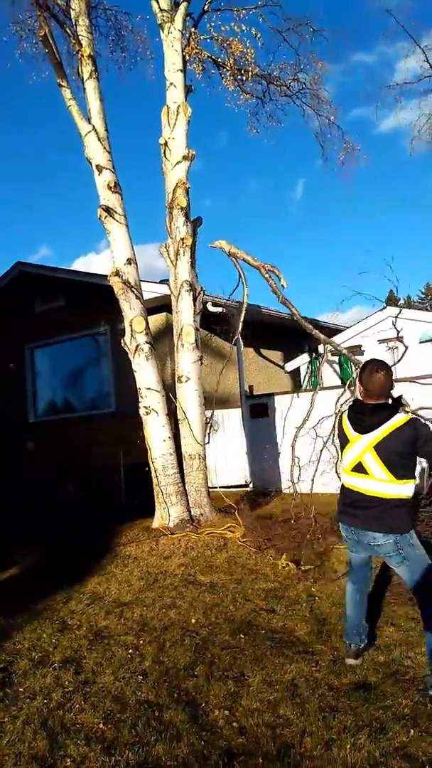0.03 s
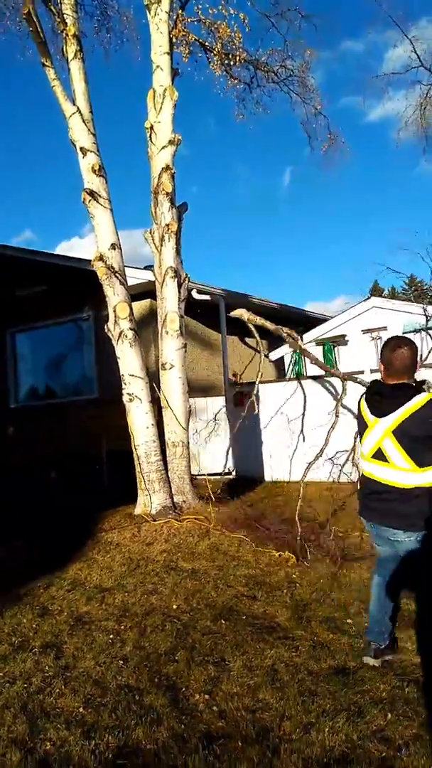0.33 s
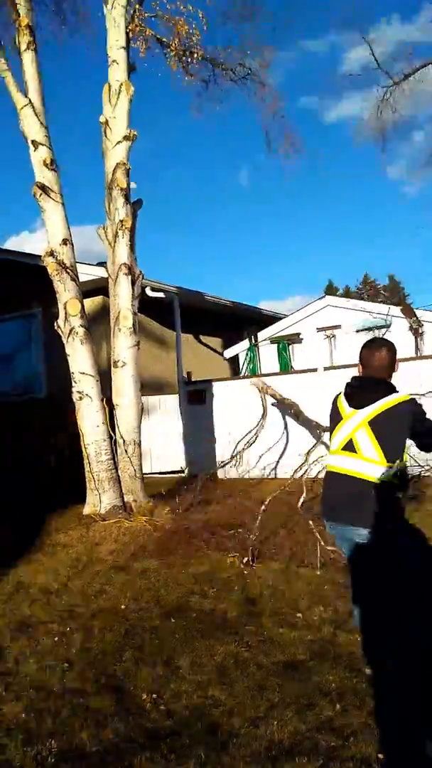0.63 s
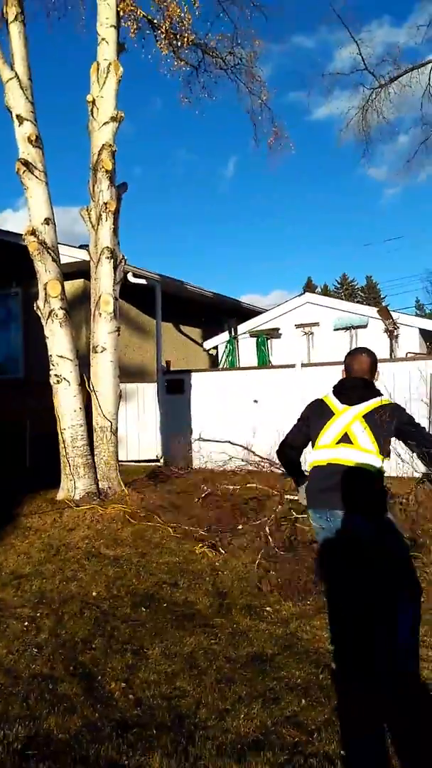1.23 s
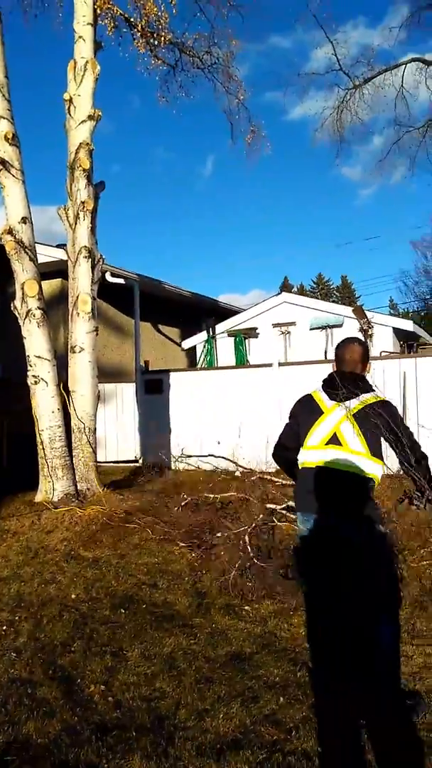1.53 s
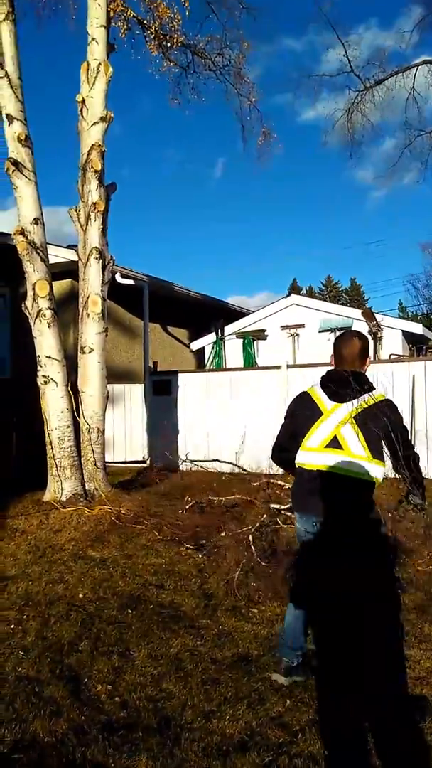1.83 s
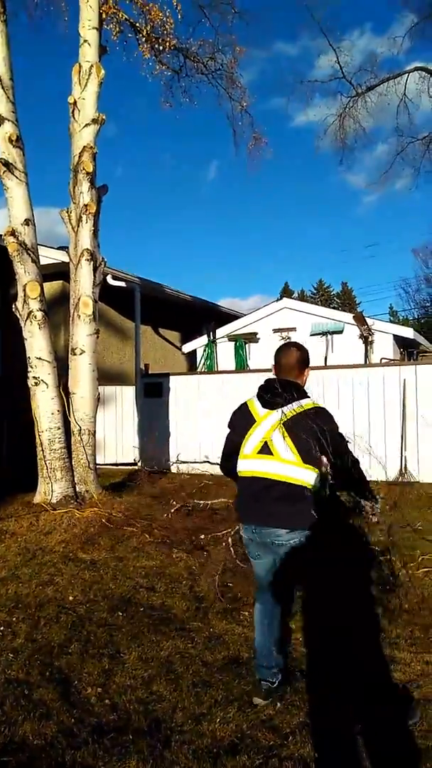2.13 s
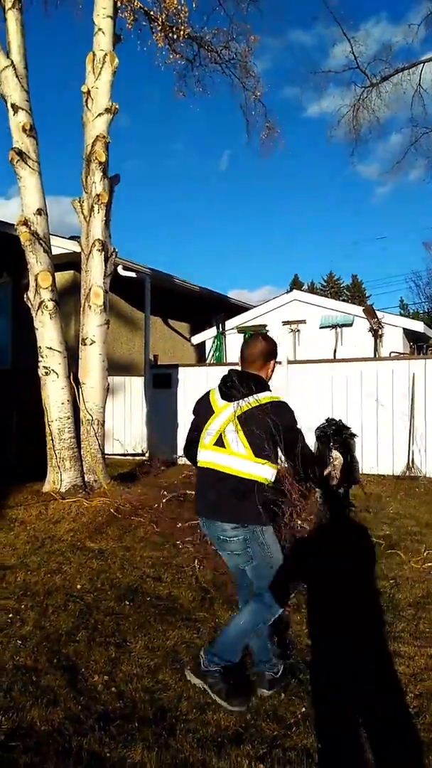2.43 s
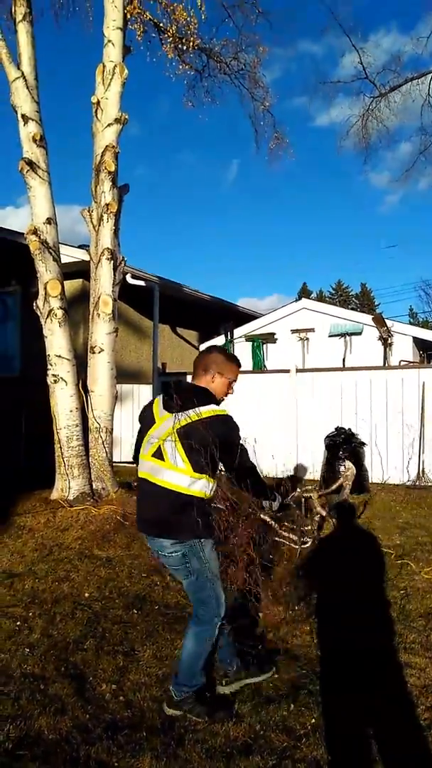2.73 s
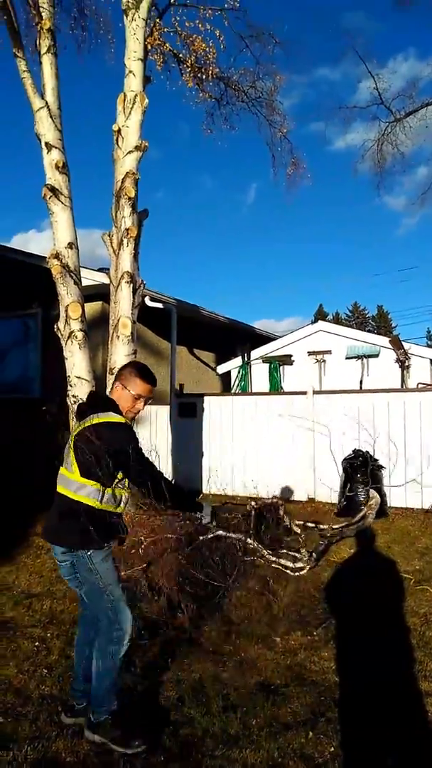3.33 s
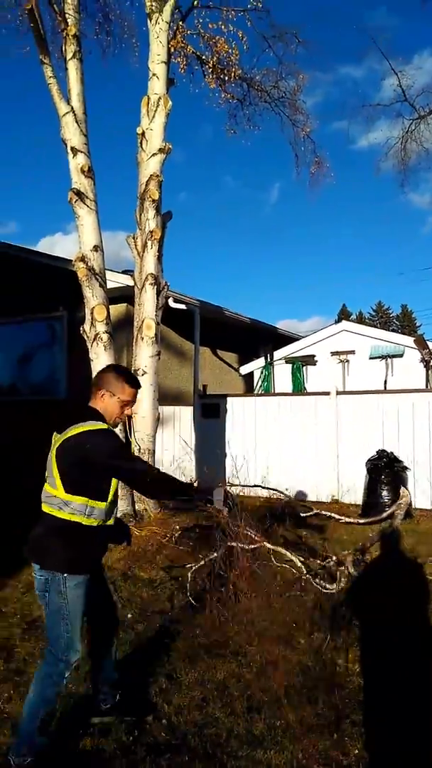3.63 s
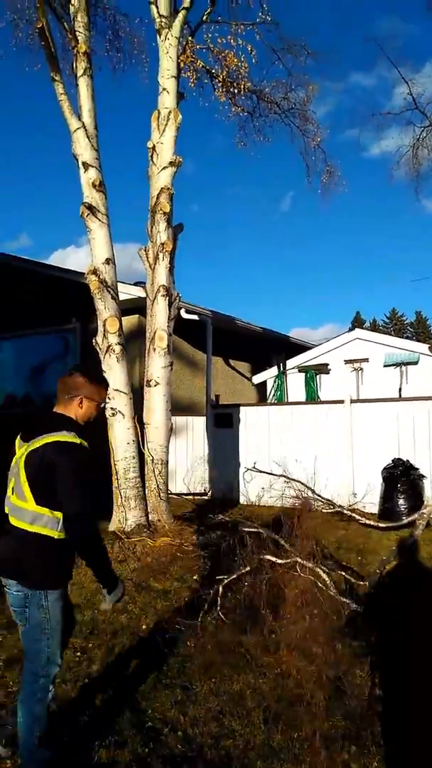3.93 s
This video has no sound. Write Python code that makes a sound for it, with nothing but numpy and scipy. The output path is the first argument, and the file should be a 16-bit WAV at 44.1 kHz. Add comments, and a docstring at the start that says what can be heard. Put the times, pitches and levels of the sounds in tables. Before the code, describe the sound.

Twigs snap and rustle as a branch is dragged over a lawn in gusty wind.

```python
"""From the start, wind tumbles over the two openings (ports) of a microphone in low buffets,
nearly opposite in left and right, over faint town air. At once a cut birch branch is swung down
onto a lawn and dragged: its limbs knock, its twigs snap, crackle and swish through dry grass.
The wind rises, and at about 3 s a hard gust overloads the microphone with a click.
Near the end a faint chord hangs in the air, like a far-off train horn."""
import sys
import numpy as np
from scipy import signal
from scipy.fft import rfft, irfft, next_fast_len
from scipy.io import wavfile
from scipy.ndimage import uniform_filter1d, minimum_filter1d, map_coordinates

SR = 44100
rng = np.random.default_rng(int(sys.argv[2]) if len(sys.argv) > 2 else 0)


def pcm_store(signal):
    """Save signal as 16-bit PCM."""
    levels = np.round(np.clip(np.atleast_2d(signal), -1, 1) * 32767)
    wavfile.write(sys.argv[1], SR, levels.astype(np.int16).T)


N = 176400  # samples: 4 seconds


def amp(db):
    """Turn decibels into a number to multiply by."""
    return 10 ** (np.asarray(db) / 20)


def unit(x):
    """Scale a signal to an average power of 1."""
    return x / np.sqrt(np.mean(x ** 2) + 1e-20)


def curve(rows):
    """Join (time [s], value) points with straight lines, one value per sample."""
    return np.interp(np.arange(N) / SR, *np.transpose(rows))


def wobble(per_s):
    """A smooth curve through per_s random values a second."""
    return map_coordinates(rng.standard_normal(int(N * per_s / SR) + 4), [np.arange(N) * per_s / SR])


def gain_at(points, hz):
    """Read the gain at hz from (frequency [Hz], level [dB]) points."""
    point_hz, db = np.transpose(points)
    return amp(np.interp(np.log(hz + 1), np.log(point_hz), db))


def filtered(x, response):
    """Multiply each frequency in x by response(hz)."""
    size = next_fast_len(N + SR // 2)
    return irfft(rfft(x, size) * response(np.fft.rfftfreq(size, 1 / SR)), size)[..., :N]


def coloured(x, points):
    """Give x a tone colour (a balance of low and high); white noise keeps its power."""
    return filtered(x, lambda hz: unit(gain_at(points, hz)))


def town_air():
    """The distant town: a faint, steady wash of noise."""
    # tone colour of the air (frequency [Hz], relative level [dB])
    colour = [(60, -3), (500, 6), (1000, 12.5), (1700, 2.5), (2100, -18.5), (2600, -56), (6000, -15.5),
              (15000, -41)]
    return amp(-61) * coloured(rng.standard_normal(N), colour)


def turbulence(colour, span):
    """Churning air: coloured noise whose strength is evened out over span samples."""
    noise = coloured(rng.standard_normal(N), colour)
    power = uniform_filter1d(uniform_filter1d(noise ** 2, span), span)
    return noise / np.sqrt(np.abs(power) + 1e-9)


def wind():
    """Buffets of wind swell a low rumble at the two ports; small swirls sputter on top."""
    # wind at the microphone (time [s], strength [dB])
    strength = [(0.0, -33), (0.2, -22), (0.33, -48.5), (0.44, -35.6), (0.7, -23), (0.76, -50.5),
                (0.81, -44), (0.9, -15), (0.97, -42.9), (1.08, -28.5), (1.23, -35.5), (1.3, -23.5),
                (1.48, -19), (1.68, -26.5), (1.8, -26.5), (1.93, -8.5), (2.05, -16.5), (2.23, -22.3),
                (2.45, -21.5), (2.6, -19), (2.7, -20.5), (2.83, -22.5), (2.93, -24), (3.09, -22),
                (3.2, -17.5), (3.33, -17), (3.5, -31), (3.65, -19.5), (3.76, -7), (3.86, -17.5),
                (3.94, -12.4), (4.0, -9)]
    # single shoves of air (time of crest [s], width [s], rise [dB])
    buffets = [(0.015, 0.0152, 8), (0.102, 0.012, 8.5), (0.244, 0.0081, 2), (0.288, 0.016, 15.5),
               (0.339, 0.014, 23.5), (0.378, 0.0078, 19.5), (0.411, 0.0089, 21.5), (0.447, 0.015, 18.5),
               (0.487, 0.0035, 15), (0.514, 0.0032, 10), (0.555, 0.022, 10), (0.64, 0.0063, 7),
               (0.73, 0.012, 7), (0.783, 0.013, 14), (0.839, 0.007, 13), (0.924, 0.0036, 6),
               (0.962, 0.0076, 5), (1.026, 0.0058, 16), (1.164, 0.0069, 15), (1.209, 0.0065, 11.5),
               (1.27, 0.018, 9), (1.385, 0.0057, 1), (1.406, 0.008, 2.5), (1.476, 0.0077, 6),
               (1.581, 0.017, 4.5), (1.626, 0.014, 9), (1.668, 0.0043, 10.5), (1.724, 0.026, 11),
               (1.799, 0.021, 10), (1.861, 0.0097, 4.5), (1.904, 0.0036, 1.5), (2.099, 0.02, 8.5),
               (2.153, 0.014, 14.5), (2.194, 0.0098, 8.9), (2.23, 0.0068, 6.5), (2.274, 0.023, 11.5),
               (2.324, 0.013, 10.0), (2.375, 0.0096, 13), (2.42, 0.0089, 14), (2.448, 0.0089, 13),
               (2.475, 0.0094, 8.5), (2.499, 0.0076, 13.5), (2.561, 0.011, 6.6), (2.627, 0.015, 6),
               (2.74, 0.01, 13), (2.773, 0.0087, 15), (2.802, 0.013, 12.5), (2.857, 0.015, 10.5),
               (2.88, 0.0079, 12), (2.892, 0.0065, 7), (2.919, 0.0051, 15), (2.952, 0.015, 21),
               (2.985, 0.0062, 20), (3.013, 0.0072, 9.5), (3.039, 0.0068, 9.5), (3.145, 0.022, 9),
               (3.211, 0.0052, 3.5), (3.243, 0.0053, 6), (3.29, 0.0087, 5), (3.327, 0.0089, 7),
               (3.376, 0.0067, 7), (3.434, 0.028, 10), (3.488, 0.013, 14), (3.531, 0.014, 14),
               (3.589, 0.021, 15), (3.648, 0.0089, 10.5), (3.673, 0.0057, 9), (3.737, 0.014, 2.5),
               (3.818, 0.0075, 13), (3.878, 0.0046, 4), (3.938, 0.0062, 8.5), (3.964, 0.0024, 5.5)]
    # rumble that is opposite at the two ports (frequency [Hz], relative level [dB])
    opposite_colour = [(20, -38), (33, -26), (50, -27), (80, -1), (140, 2), (230, -4.5), (400, -15.5),
                       (650, -27.5), (1000, -51), (1400, -52.5), (2200, -65.5), (4000, -83.5)]
    # rumble that both ports share (frequency [Hz], relative level [dB])
    shared_colour = [(20, -40), (35, -42), (60, -11.5), (140, 3.5), (330, -3), (600, -16.5), (1000, -25.5),
                     (1600, -33), (2500, -70), (4000, -69)]
    crest_s, width_s, rise_db = np.transpose(buffets)
    crests = np.exp(-.5 * ((np.arange(N) / SR - crest_s[:, None]) / width_s[:, None]) ** 2)
    sway_db, flicker_db, lean_right_db = 0.56, 3, 0.93
    strength_db = curve(strength) + sway_db * wobble(45) + rise_db @ crests
    push = amp(strength_db) * unit(amp(flicker_db * wobble(170)))
    opposite = amp(-2) * push * turbulence(opposite_colour, span=700)
    shared = amp(-15) * push * turbulence(shared_colour, span=600) + pops(strength_db)
    return np.array([shared + opposite, shared - opposite]) * amp([[-lean_right_db], [lean_right_db]])


def eddy(t, width_s):
    """The pressure swing as one eddy, a small swirl of air, passes a port; peak near 1."""
    u = t / width_s
    shape = rng.uniform(0, 2 * np.pi)  # blends a bump with a down-and-up swing
    return (np.cos(shape) * (1 - u * u) + np.sin(shape) * np.sqrt(np.e) * u) * np.exp(-u * u / 2)


def pops(strength_db):
    """Small eddies sputter at random, louder in stronger wind; the strongest stand out as pops."""
    # strong eddies; big ones thump low (time [s], relative level [dB], pitch before lowering [Hz])
    strong_eddies = [(0.4137, -28.5, 400), (0.5467, -24.3, 352), (0.6871, -27.5, 480), (0.8322, -24, 580),
                     (0.8964, -20, 410), (1.0233, -24.5, 656), (1.1344, -30, 480), (1.1592, -27, 453),
                     (1.2719, -33.7, 420), (1.2895, -29, 460), (1.3804, -23.5, 400), (1.4, -28.0, 360),
                     (1.4498, -29.5, 530), (1.5318, -23.5, 494), (1.5679, -21.5, 514), (1.5804, -21.5, 566),
                     (1.6685, -25.5, 454), (1.729, -21.5, 576), (1.9271, -21, 290), (1.9384, -25.4, 450),
                     (2.024, -22, 470), (2.0805, -20.5, 297), (2.1009, -23.5, 430), (2.1494, -18.5, 386),
                     (2.156, -24.5, 253), (2.2873, -24.5, 382), (2.3174, -20, 470), (2.3771, -19, 410),
                     (2.421, -15, 405), (2.446, -20, 250), (2.497, -18.5, 298), (2.5587, -23.5, 310),
                     (2.6276, -32, 570), (2.7408, -21, 573), (2.7688, -16, 326), (2.7765, -17.5, 438),
                     (2.7969, -16.3, 484), (2.881, -23.5, 341), (2.9547, -11.5, 480), (2.9783, -17.5, 497),
                     (3.1209, -22, 494), (3.1432, -17.5, 370), (3.201, -17.5, 514), (3.2868, -14, 360),
                     (3.305, -20.5, 390), (3.317, -17.5, 357), (3.42, -19, 430), (3.4324, -19, 430),
                     (3.6675, -17.5, 424), (3.7332, -6.5, 490), (3.7479, -12, 622), (3.8156, -11, 470),
                     (3.908, -27, 580), (3.9254, -18.5, 625), (3.9459, -18, 450), (3.9603, -13.5, 440),
                     (3.987, -16.5, 616)]
    # tone colour of a pop (frequency [Hz], gain [dB])
    colour = [(30, -29), (120, -7), (300, 1.5), (700, -0.5), (1200, 0.5), (1800, 1), (2600, -14),
              (5000, -32)]
    sputters_per_s, lowering = 190, 0.82
    starts = np.flatnonzero(rng.random(N) < sputters_per_s / SR)
    sputter_db = strength_db - 19.5 + 3 * np.minimum(rng.exponential(size=N), 2)
    widths_s = .00046 * np.exp(0.14 * rng.standard_normal(N))
    small = [(i, sputter_db[i], widths_s[i]) for i in starts]
    strong = [(round(s * SR), db, 1 / (2 * np.pi * lowering * hz)) for s, db, hz in strong_eddies]
    out, t = np.zeros(N + SR), np.arange(-256, 256) / SR
    for i, db, width_s in strong + small:
        out[i:i + len(t)] += amp(db) * eddy(t, width_s)
    lead_in = 192  # samples skipped, so each pop peaks just after its start time
    return filtered(out[lead_in:][:N], lambda hz: gain_at(colour, hz))


def rustle():
    """Twigs brush the grass: tiny touches blur into a swish, bigger ones crackle. Three paths."""
    # how loudly the branch drags (time [s], level [dB])
    drag = [(0, -49.5), (.02, -50.5), (.04, -36.5), (.09, -44.5), (.12, -40), (.2, -45.5), (.28, -33.5),
            (.34, -38), (.39, -41.5), (.5, -50), (.6, -56), (.72, -55.5), (.86, -47), (.94, -41),
            (1.02, -45.5), (1.12, -50.5), (1.26, -55.5), (1.39, -51), (1.52, -60), (1.68, -67.5),
            (2.05, -68.5), (2.065, -62), (2.105, -61), (2.125, -49), (2.19, -51), (2.32, -59.5),
            (2.42, -59), (2.52, -56.5), (2.61, -59), (2.74, -56.5), (2.85, -61), (2.91, -53.5),
            (2.935, -41.5), (3.0, -61.5), (3.1, -62), (3.17, -60.5), (3.5, -58), (3.85, -58), (4, -58)]
    crackles_per_s, spread_db, fade_s = 150, 4.5, 0.0056
    t = np.arange(SR // 20) / SR
    sizes = amp(spread_db * np.minimum(rng.exponential(size=N), 3))
    touches = sizes * (rng.random(N) < crackles_per_s / SR)
    power = signal.fftconvolve(touches ** 2, amp(-60 * t / fade_s) ** 2)[:N]
    crackle = unit(np.sqrt(np.abs(power)) * rng.standard_normal((3, N)))
    swish = rng.standard_normal((3, N))
    return amp(curve(drag)) * (amp(-4.5) * swish + amp(-10) * crackle)


def snaps():
    """Twigs break in sharp bursts: thin ones tick high, thick ones crack lower. Three paths."""
    # breaking twigs (time [s], level [dB], time to fade by 60 dB [s], low edge of the sound [Hz])
    breaks = [(0.027, -31, 0.034, 700), (0.1, -21.5, 0.018, 1500), (.106, -26.5, 0.03, 1200),
              (.115, -33, 0.014, 1200), (0.214, -26, 0.012, 5000), (0.2226, -28, 0.014, 1500),
              (.244, -22, 0.025, 1000), (0.2486, -24, 0.022, 1200), (.268, -28, 0.04, 900),
              (0.2827, -23, 0.027, 1500), (.294, -22, 0.021, 1310), (.304, -24, .015, 1300),
              (.319, -29.5, 0.013, 1800), (0.336, -22.5, 0.018, 1810), (0.338, -19.5, 0.016, 2960),
              (0.359, -24.5, 0.014, 2000), (.384, -37.5, 0.016, 4000), (.427, -28.5, .008, 5000),
              (0.478, -33, 0.012, 4000), (0.5277, -38, 0.0069, 6000), (0.544, -43.5, 0.019, 3980),
              (0.623, -39.5, 0.0071, 4000), (0.73, -25.5, 0.0092, 1500), (.75, -32.5, 0.017, 2500),
              (.779, -34.5, 0.012, 5000), (.804, -39.5, 0.0076, 6000), (0.818, -31, 0.0086, 6000),
              (0.834, -34, 0.02, 3000), (0.859, -40.5, 0.029, 2500), (0.881, -23.5, 0.019, 1190),
              (0.887, -38.5, 0.042, 800), (0.903, -30, 0.011, 1500), (0.9051, -15.5, 0.0069, 3000),
              (0.929, -26.5, 0.016, 3000), (1.279, -29.5, 0.0099, 3600), (1.361, -39, 0.012, 4000),
              (2.113, -47, 0.023, 2510), (2.147, -36.5, 0.015, 900), (2.22, -32.5, 0.011, 4030),
              (2.4503, -39.5, 0.01, 6960), (2.493, -29.5, 0.006, 7000), (2.504, -38.5, .007, 900),
              (2.515, -35, 0.0074, 7000), (2.881, -43, .006, 1010), (2.929, -40, 0.022, 6030),
              (3.6837, -30.5, 0.0095, 6000), (3.8937, -31, 0.013, 4870)]
    out, t = np.zeros((3, N + SR)), np.arange(4096) / SR
    hz = np.fft.rfftfreq(len(t), 1 / SR)
    attack = 1 - np.exp(-t / 0.00035)
    for s, db, fade_s, edge_hz in breaks:
        tint = amp(2 * signal.resample(rng.standard_normal(14), len(hz)))  # each twig's own colour
        low_cut = hz ** 2 / np.hypot(hz ** 2, edge_hz ** 2)
        noise = rng.standard_normal((3, len(t)))
        burst = unit(irfft(rfft(noise) * tint * low_cut))
        out[:, round(s * SR):][:, :len(t)] += amp(db - 60 * t / fade_s) * attack * burst
    return out[:, :N]


def knocks():
    """Thick limbs hit the ground and each other, ringing a little differently at each spot."""
    # hits of the limbs (time [s], relative level [dB])
    hits = [(.029, -27.5), (.1, -37), (.106, -26.5), (.191, -33.5), (.224, -42), (.245, -35), (.253, -34.5),
            (.272, -35), (.284, -34.5), (.294, -37), (0.878, -31), (.904, -35.5)]
    # tones the wood rings with (frequency [Hz], relative level [dB], time to fade by 60 dB [s])
    wood_tones = [(816, 1.5, .055), (1097, -3.5, 0.032), (1425, -6, 0.036), (2100, -6, 0.037),
                  (3140, -14.5, 0.027), (4010, -10, .04), (4650, -9, .025), (5550, -6, .02)]
    spread_db, detune = 1, 0.061
    out, t = np.zeros(N + SR), np.arange(SR // 8) / SR
    attack = 1 - np.exp(-t / 0.0019)
    for s, db in hits:
        ring = np.zeros(len(t))
        for hz, tone_db, fade_s in wood_tones:
            level = amp(tone_db + rng.normal(0, spread_db) - 60 * t / fade_s)
            pitch_hz = hz * np.exp(rng.normal(0, detune))
            ring += level * np.sin(2 * np.pi * pitch_hz * t)
        out[round(s * SR):][:len(t)] += amp(db - 2) * attack * ring
    return out[:N]


def echoes(x, fade_s):
    """Fence and walls throw the sound back as a short tail that fades by 60 dB in fade_s."""
    t = np.arange(SR // 2) / SR
    tail = rng.standard_normal(len(t)) * amp(-60 * t / fade_s)
    return signal.fftconvolve(x, tail / np.linalg.norm(tail))[:N]


def branch():
    """The branch lands, then sounds thinner as it comes to lie in the grass."""
    # twigs striking the ground (frequency [Hz], relative level [dB])
    striking_colour = [(300, -15), (900, -2), (2000, -1.5), (3000, -0.5), (3900, 1.5), (5000, 1.5),
                       (6200, -0.5), (8500, -5.5), (10000, 0), (11500, 3), (14200, 3), (15300, -1.5),
                       (16300, -19)]
    # the lighter swish in the grass (frequency [Hz], relative level [dB])
    grass_colour = [(300, -28), (1500, 2.5), (3500, -3), (5000, -10.5), (6800, -10), (9000, -6),
                    (11500, -1), (14500, 3), (15400, 2), (16300, -18)]
    # twig sound that reaches each port by its own path (frequency [Hz], gain [dB])
    scatter_colour = [(1000, -11.5), (2600, -34.5), (3900, -13.5), (5200, -13), (9000, 1.5), (15000, -13)]
    contacts = snaps() + rustle()  # three paths: direct, scattered left, scattered right
    contacts[0] += knocks()
    lying = curve([(0.3, 0), (2.3, 1)])  # settles between 0.3 s and 2.3 s
    paths = (1 - lying) * coloured(contacts, striking_colour) + lying * coloured(contacts, grass_colour)
    left = paths[0] + amp(-14) * echoes(paths[0], fade_s=0.076)
    lag_s = .00039  # the right port hears the same sound late and upside down
    right = -filtered(left, lambda hz: np.exp(-2j * np.pi * hz * lag_s))
    scattered = filtered(paths[1:], lambda hz: gain_at(scatter_colour, hz))
    return np.array([left, right]) + scattered


def overload():
    """A hard gust overloads the microphone with one dry click, mostly at the right port."""
    # tone colour of the click (frequency [Hz], gain [dB])
    colour = [(300, -7), (1400, 0), (2600, -7), (3800, -19.5), (5000, -17.5), (6500, -27), (12000, -36.5)]
    click_s = 2.982
    pulse = amp(5.1) * (np.arange(N) == round(click_s * SR))
    click = filtered(pulse, lambda hz: gain_at(colour, hz))
    return np.array([amp(-11) * click, click])


def horn():
    """A far horn holds a chord whose tones waver in the wind."""
    # tones of the chord (frequency [Hz], level [dB])
    tones = [(830, -72), (1249, -52), (1550, -60), (1663, -60)]
    start_s, end_s, fade_s = 3.25, 3.94, 0.044
    waver_db, waver_hz = 1.3, 1.43
    t, chord = np.arange(N) / SR, np.zeros(N)
    for hz, db in tones:
        level = np.sqrt(2) * amp(db + waver_db * wobble(11))
        cycles = np.cumsum(hz + waver_hz * wobble(20)) / SR
        chord += level * np.sin(2 * np.pi * cycles)
    return chord * np.clip(np.minimum(t - start_s, end_s - t) / fade_s, 0, 1)


def scene():
    """Branch, wind, click and horn over the quiet town air, in left and right."""
    return branch() + wind() + overload() + horn() + town_air()


def record(dry):
    """Cut the deepest bass, turn down any peak that is too loud, and drop the highest treble."""
    low_cut_hz, top_hz, ceiling = 54, 16450, .97
    x = filtered(dry, lambda hz: hz ** 2 / np.hypot(hz ** 2, low_cut_hz ** 2))
    span = int(.004 * SR)
    safe_gain = np.minimum(1, ceiling / (np.abs(x).max(axis=0) + 1e-9))
    held_gain = minimum_filter1d(safe_gain, 2 * span)
    smooth_gain = uniform_filter1d(uniform_filter1d(held_gain, span), span)
    return filtered(x * smooth_gain, lambda hz: hz < top_hz)


dry = scene()
out = record(dry)
pcm_store(out)
```